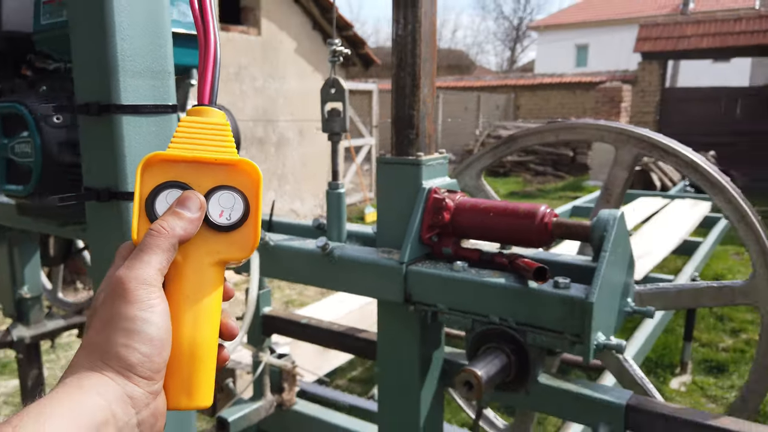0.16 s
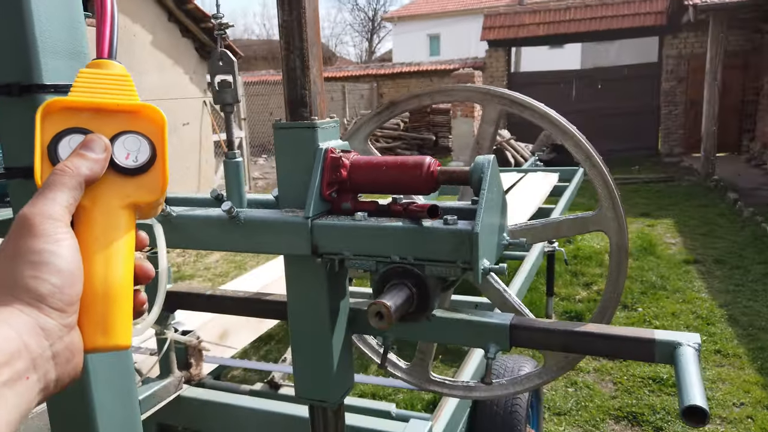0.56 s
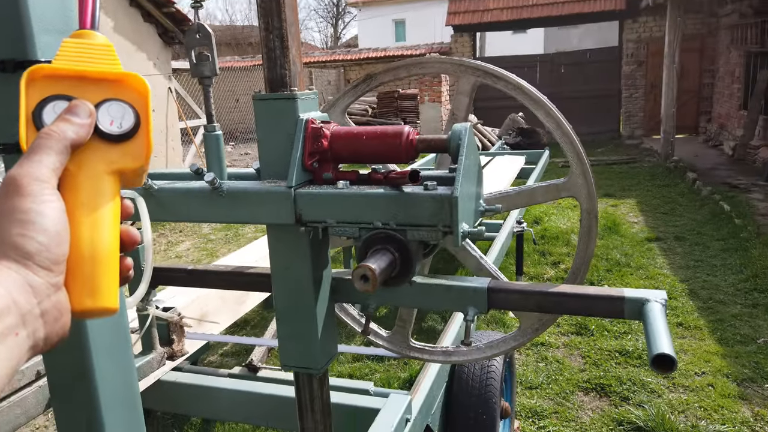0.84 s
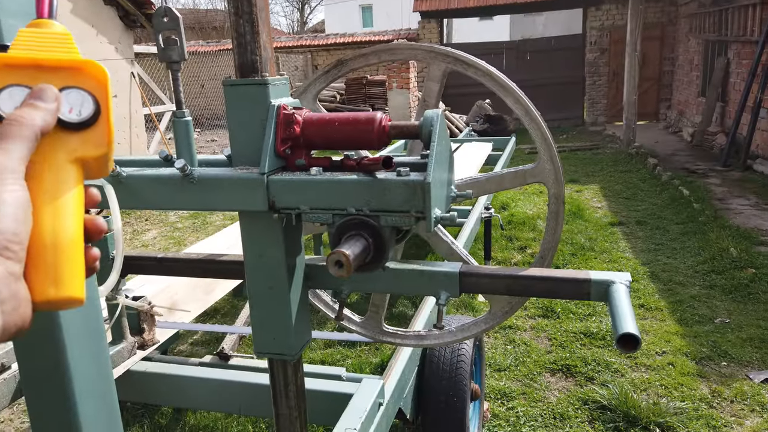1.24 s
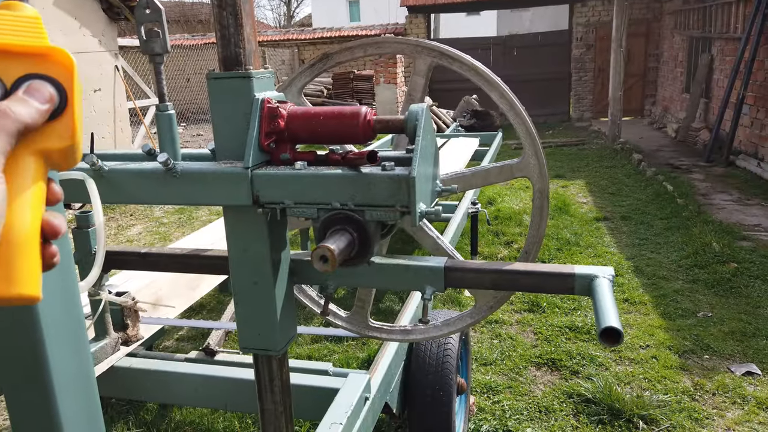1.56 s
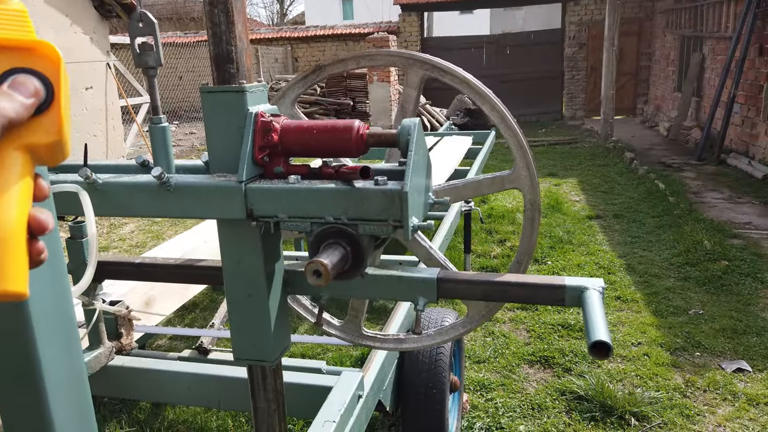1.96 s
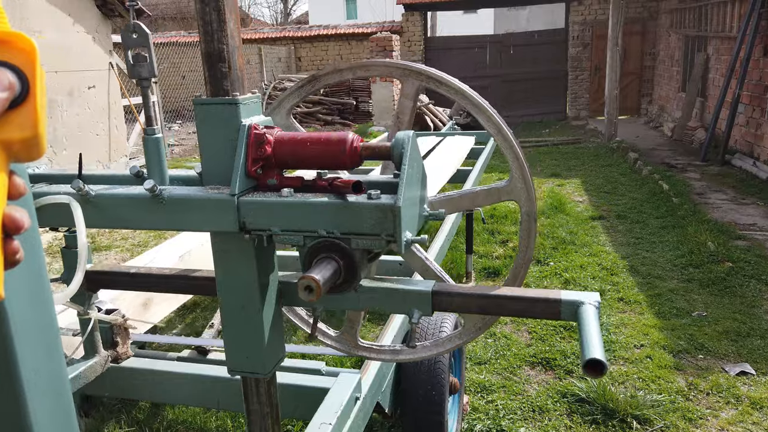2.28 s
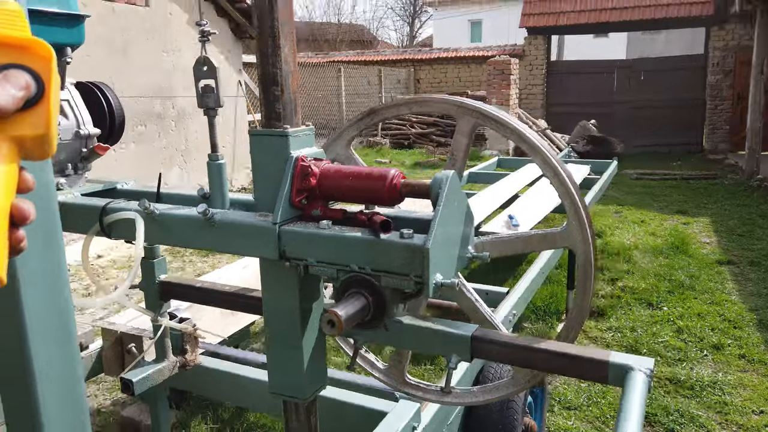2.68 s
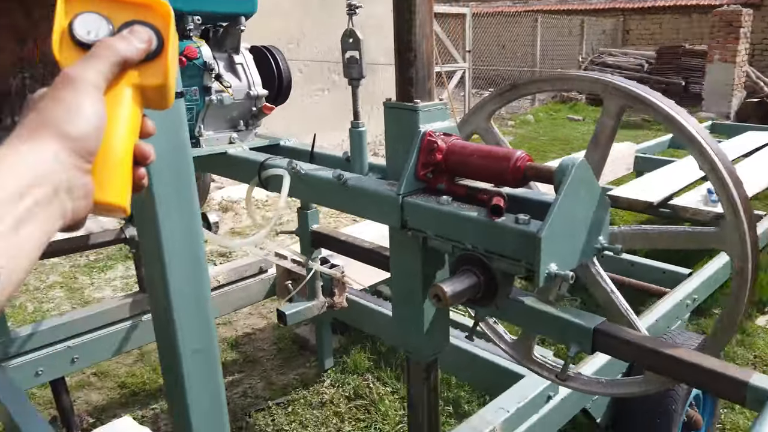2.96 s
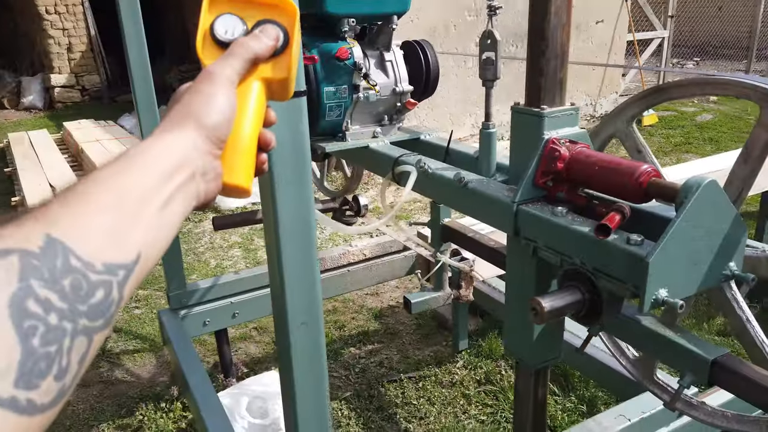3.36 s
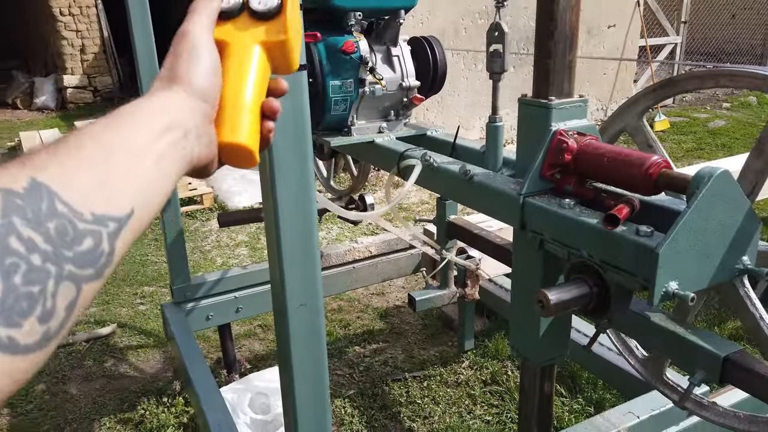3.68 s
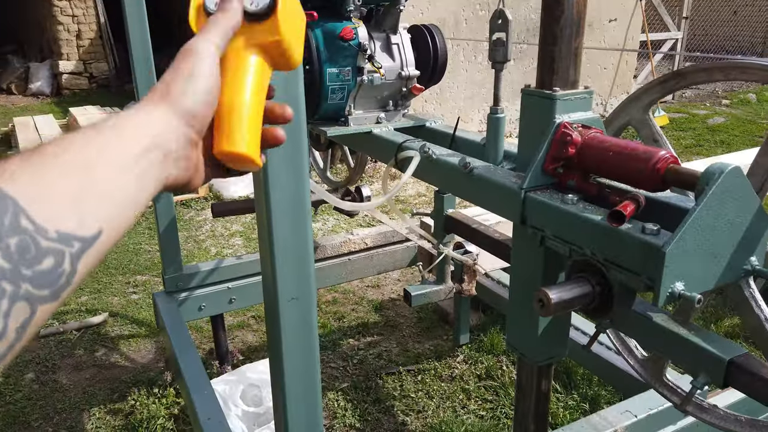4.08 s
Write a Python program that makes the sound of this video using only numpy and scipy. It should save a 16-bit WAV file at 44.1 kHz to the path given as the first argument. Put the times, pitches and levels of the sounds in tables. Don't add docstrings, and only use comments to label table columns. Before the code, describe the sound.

Close by in an open yard, a small electric hoist is already running with a gritty gear whine. It brakes at about one second, leaving a faint metal ring. Cable ticks and a thumb click fill the pause, then the motor lowers in two louder, slightly higher runs, slowing between them and coasting down at the end.

```python
import sys
import numpy as np
from scipy import signal
from scipy.fft import rfft, irfft, next_fast_len
from scipy.io import wavfile
from scipy.ndimage import uniform_filter1d

SR = 44100
rng = np.random.default_rng(int(sys.argv[2]) if len(sys.argv) > 2 else 0)


def ratio_of_db(decibels):
    return 10 ** (np.asarray(decibels, float) / 20)


def inscribe(sig):
    pcm = np.round(np.clip(np.atleast_2d(sig).T, -1, 1) * 32767)
    wavfile.write(sys.argv[1], SR, pcm.astype(np.int16))


N = 186498

# frequency in Hz, density in dB per Hz.
HUM_SPECTRUM = [(20, -19.5), (66, -24), (130, -27), (250, -36), (480, -38), (900, -44), (1900, -42),
                (2700, -43), (5000, -51), (8000, -63.5), (15000, -79)]
# on in s, off in s, first mesh in Hz, last mesh in Hz, friction in Hz per s.
HOIST_RUNS = [
    (-.5, 0.94, 257, 282, 370),
]
# on in s, off in s, first mesh in Hz, last mesh in Hz, friction in Hz per s.
LOWER_RUNS = [
    (1.655, 2.375, 346, 336, 305),
    (2.752, 3.437, 333, 339, 222),
]
# multiple of the mesh, level in dB.
HOIST_HARMONICS = [(2, -13.5), (3, -4.5), (4, -8), (5, -2), (6, -5), (7, -6), (8, -1.5), (9, -17),
                   (10, -12), (11, 1), (12, -7), (13, -7.5), (14, -15), (15, -11)]
# multiple of the mesh, level in dB.
LOWER_HARMONICS = [(2, -5.5), (3, -1), (4, 0), (5, 3), (6, 4.5), (7, 1.5), (8, -1), (9, 0), (10, -4),
                   (11, -15), (12, -4), (13, -8), (14, -10.5)]
# frequency in Hz, density in dB per Hz.
HOIST_RATTLE_SPECTRUM = [(150, -33.5), (260, -13), (700, -16.5), (1400, -9.5), (2200, -2), (3100, 0),
                         (3900, -11), (5500, -19.5), (8000, -28.5), (11500, -32.5), (15500, -47)]
# frequency in Hz, density in dB per Hz.
LOWER_RATTLE_SPECTRUM = [(150, -54), (300, -13.5), (700, -17.5), (1300, -10.5), (2200, -2.5), (3400, -9),
                         (4300, -13.5), (5500, -14.5), (8000, -23), (11500, -25.5), (15500, -36.5)]
# frequency in Hz, width in Hz, gain in dB.
CASING_MODES = [(459.6, 2.4, 17), (600, 5.2, 4.5), (833.7, 12, 14), (1290, 60, 0), (1572, 42, -3),
                (2070, 42, -5.5), (2430, 38, -9), (3214, 130, 0), (3512, 290, -4), (3985, 270, -4.5),
                (5470, 97, -3), (6550, 190, -5), (8000, 240, -1)]
# frequency in Hz, density in dB per Hz.
SHUDDER_SPECTRUM = [(60, -28.5), (100, -8.5), (150, -3.5), (210, -5), (300, -13), (410, -0.5), (700, -12.5),
                    (1200, -46)]
# start in s, level in dB.
BRAKE_JOLTS = [
    (0.96, -0.5),
]
# frequency in Hz, level in dB, t60 in s.
FRAME_MODES = [(436, -46, 0.58), (465, -78, .9), (745, -68.5, 0.64), (900, -65, 1.15), (1109, -63, 0.66),
               (1420, -59, 0.38), (1390, -57, 0.47), (1630, -62, 0.89), (1900, -50.5, 1.03),
               (2320, -73, 1.8), (2510, -68, 0.59), (2918, -69, 1.1), (5900, -63, 0.39)]
# start in s, peak in dB, pitch factor, low knock in dB.
CABLE_TICKS = [
    (1.0844, -48, 1.15, -11),
    (1.2003, -63, .99, -6),
    (1.2486, -56, .995, -22),
    (1.3668, -52, 1.04, -16.5),
    (1.5744, -62, .98, -16),
    (1.6244, -62, 1.02, -4),
]
CABLE_RINGS_HZ = (1900, 1990, 2500)
# start in s, peak in dB, pitch factor, low knock in dB.
SWITCH_CLICKS = [
    (1.4795, -41, 1.0, -32),
    (1.5843, -54, 1.02, -16),
    (1.6062, -56, 1.0, -10),
]
SWITCH_RINGS_HZ = (1490, 2235, 3600)
# time in s, side from +1 nearer the right port to -1 nearer the left.
WINCH_BEARING = [
    (0, 1),
    (2.7, 0.21),
    (3.1, -1.3),
    (4.23, -0.044),
]
# frequency in Hz, share 0 to 1.
PORT_SHARE = [(100, .7), (800, 0.83), (1400, .6), (3000, 0.4), (6000, .4), (15000, .3)]
# frequency in Hz, side minus mid in dB.
SIDE_WIDTH = [(60, -14), (110, -30.5), (200, -30), (380, -18), (700, -4.5), (1290, -5.5), (2380, -3),
              (4400, -2), (8120, 2), (15000, -0.5)]

TEETH = 16
SPIN_UP_S = 0.047
HOIST_DRAG_S, LOWER_DRAG_S = 0.1, 1.2
LOAD_DB_PER_DECADE, BRIGHT_DB_PER_DECADE, TONE_DB_PER_DECADE = 14, 18.5, 56.5
STALL_DB = 35
TORQUE_DB, TORQUE_BRIGHT_DB = -9.5, 9
TURN_DB, TURN_BRIGHT_DB = -2, -3
COAST_WHINE_DB, COAST_BRIGHT_DB = -2, -1
SHAKE_DB, SHAKE_PEAK_DB, SHAKE_HZ, SHAKE_OCTAVES, SHAKE_T60_S = -52.5, 6.5, 165, 0.37, 0.23


def evened(x):
    return x / np.sqrt(np.mean(x ** 2) + 1e-20)


def read(points, hz):
    f, value = np.transpose(points)
    return np.interp(np.log(hz + 1), np.log(f + 1), value)


def colour(x, points):
    n = x.shape[-1]
    size = next_fast_len(n)
    gain = ratio_of_db(read(points, np.fft.rfftfreq(size, 1 / SR)))
    return irfft(rfft(x, size) * gain, size)[..., :n]


def resonate(x, hz, width_hz):
    return signal.lfilter(*signal.iirpeak(hz, hz / width_hz, SR), x)


def drift(n, top_hz, count=1):
    step = 64
    noise = rng.standard_normal((count, n // step + 200))
    slow = signal.lfilter(*signal.butter(2, top_hz, fs=SR / step), noise)[:, 198:]
    return np.squeeze([np.interp(np.arange(n) / step, np.arange(len(v)), evened(v)) for v in slow])


def yard():
    hum = evened(colour(rng.standard_normal(N), HUM_SPECTRUM))
    wind = evened(resonate(resonate(rng.standard_normal(N), 42, 33), 42, 33))
    return hum * ratio_of_db(-73.5 + 2.7 * drift(N, 2.8)) + wind * ratio_of_db(-73 + drift(N, 3.9))


def motor(runs, drag_s):
    t = np.arange(N) / SR
    hz, torque, coast, left_hz = np.zeros(N), np.zeros(N), np.ones(N), 0
    next_on_s = [run[0] for run in runs[1:]] + [N / SR]
    for (on, off, first_hz, last_hz, friction), after in zip(runs, next_on_s):
        aim_hz = first_hz + (last_hz - first_hz) * np.clip((t - on) / (off - on), 0, 1)
        lag = (1 - left_hz / first_hz) * np.exp(-np.maximum(t - on, 0) / SPIN_UP_S)
        fall_hz = last_hz + friction * drag_s
        slowing_hz = fall_hz * (np.exp(-np.maximum(t - off, 0) / drag_s) - 1)
        hz = np.where(t >= on, np.maximum(aim_hz * (1 - lag) + slowing_hz, 0), hz)
        torque = np.where(t >= on, lag * (t < off), torque)
        coast = np.where(t >= on, t >= off, coast)
        left_hz = max(last_hz + fall_hz * (np.exp(-max(after - off, 0) / drag_s) - 1), 0)
    return hz, uniform_filter1d(torque, size=200), uniform_filter1d(coast, size=900)


def levels(runs, drag_s, load_db, tone_db, strain_db_per_s):
    t = np.arange(round(max(runs[0][0], 0) * SR), N) / SR
    hz, torque, coast = (c[-len(t):] for c in motor(runs, drag_s))
    decades = np.log10(hz / hz.max() + .01)
    away = (1 - np.interp(t, *np.transpose(WINCH_BEARING))) / 2
    strain_db = strain_db_per_s * t
    fall_db = (LOAD_DB_PER_DECADE * decades - STALL_DB * decades ** 2) * (coast + 0.21 * (1 - coast))
    load_db = load_db + fall_db + TORQUE_DB * torque + TURN_DB * away
    bright_db = BRIGHT_DB_PER_DECADE * np.maximum(decades, -.7) + TORQUE_BRIGHT_DB * torque
    bright_db = bright_db + COAST_BRIGHT_DB * coast + TURN_BRIGHT_DB * away + .55 * strain_db
    tone_db = tone_db + TONE_DB_PER_DECADE * decades + strain_db + 2.0 * drift(len(t), 13)
    return t, hz + 1, load_db, bright_db, tone_db, torque, coast


def panels(x, modes_db, patchy_db):
    z = signal.stft(x, nperseg=512)[2]
    modes = evened(rng.standard_normal((len(z[0]), 1)))
    patches = uniform_filter1d(rng.standard_normal(z.shape), 5, 1)
    patches = evened(uniform_filter1d(patches, 5, 2))
    thin = np.clip(np.linspace(-.1, 3.0, len(z[0])), .2, 1)[:, None]
    z = z * ratio_of_db(modes_db * modes + patchy_db * thin * patches)
    return signal.istft(z, nperseg=512)[1][:, :x.shape[1]]


def mesh_whine(mesh, hz, runout, orders, rattle_points, wobble, uneven):
    n = len(mesh)
    whine = np.zeros((2, n))
    for k, db in orders:
        waver = 1 + uneven * np.sqrt(k) * (drift(n, 24, count=2) + 1j * drift(n, 22, count=2))
        waver = waver / np.sqrt(1 + 2 * k * uneven ** 2)
        phase = k * mesh + 2 * np.pi * rng.random((2, 1))
        radiated_db = read(rattle_points, k * hz) - read(rattle_points, k * hz.max())
        whine += ratio_of_db(db + np.minimum(0, radiated_db)) * ((waver + wobble * runout) * np.exp(1j * phase)).real
    return evened(whine)


def backlash_rattle(mesh, hz, torque, bright_db, slap, points):
    n = len(mesh)
    puffs = 3.1 + 0.16 * np.cos(mesh) * np.abs(1 + 0.061 * drift(n, 120))
    rattle = panels(rng.standard_normal((2, n)) * puffs, modes_db=2.5, patchy_db=3.06)
    rattle = evened(colour(rattle, points))
    treble = colour(rattle, [(2500, -30), (5600, 0)])
    top = colour(rattle, [(6500, -60), (8000, 0)])
    bright = ratio_of_db(bright_db) / slap ** 0.035
    pace = np.minimum(1, torque + hz / (0.52 * hz.max())) ** 3.7
    return slap * (rattle + (bright - 1) * treble + bright * (pace - 1) * top)


def gearbox(controls, orders, rattle_points, whine_db, rattle_db, wobble, uneven, slap_teeth, slap_db, casing_db):
    t, hz, load_db, bright_db, tone_db, torque, coast = controls
    n = len(t)
    mesh = 2 * np.pi * np.cumsum(hz * (1 + 0.0025 * drift(n, 25))) / SR
    shaft = mesh / TEETH
    runout = np.exp(1j * shaft) + .5 * np.exp(2j * shaft) + 0.77 * np.exp(3j * shaft) + 0.067 * np.exp(-1j * shaft)
    first = (1 + 0.34 * runout + 0.27 * drift(n, 34)) * np.exp(1j * mesh)
    tone = np.sqrt(2) * ratio_of_db(tone_db) * first.real
    slap = ratio_of_db(slap_db * np.cos(mesh / slap_teeth) + 2.0 * drift(n, 24.4))
    whine = mesh_whine(mesh, hz, runout, orders, rattle_points, wobble, uneven) * np.sqrt(slap)
    rattle = backlash_rattle(mesh, hz, torque, bright_db, slap, rattle_points)
    drive = ratio_of_db(load_db) * (ratio_of_db(whine_db + COAST_WHINE_DB * coast) * whine + ratio_of_db(rattle_db) * rattle)
    drive = drive + ratio_of_db(4) * np.abs(torque) ** .3 * resonate(drive, 3450, 300)
    casing = sum(ratio_of_db(db) * resonate(drive, f, width_hz) for f, width_hz, db in CASING_MODES)
    at = N - n
    fade_in = np.minimum(1, (t - t[0]) / 0.0074 + (at == 0))
    out = np.zeros((2, N))
    out[:, at:] = (drive + ratio_of_db(casing_db) * casing + tone) * fade_in
    return out


def winch():
    hoist = levels(HOIST_RUNS, HOIST_DRAG_S, load_db=-25, tone_db=-51, strain_db_per_s=8)
    lower = levels(LOWER_RUNS, LOWER_DRAG_S, load_db=-22, tone_db=-37.5, strain_db_per_s=-0.23)
    up = gearbox(hoist, HOIST_HARMONICS, HOIST_RATTLE_SPECTRUM, whine_db=-9, rattle_db=-3.5,
                 wobble=0.13, uneven=0.43, slap_teeth=8.7, slap_db=-1, casing_db=-9)
    down = gearbox(lower, LOWER_HARMONICS, LOWER_RATTLE_SPECTRUM, whine_db=-5.5, rattle_db=-5.5,
                   wobble=0.26, uneven=0.69, slap_teeth=32, slap_db=0, casing_db=-1)
    return up + down


def shudder():
    hz = motor(HOIST_RUNS, HOIST_DRAG_S)[0] + motor(LOWER_RUNS, LOWER_DRAG_S)[0] + .01
    peak = np.exp(-(np.log2(hz / SHAKE_HZ) / SHAKE_OCTAVES) ** 2)
    level_db = SHAKE_DB + 12 * np.log10(np.minimum(hz / 60, 1)) + SHAKE_PEAK_DB * peak
    decay_db = 60 * np.arange(N) / SR / SHAKE_T60_S
    level_db = np.maximum.accumulate(level_db + decay_db) - decay_db
    body = evened(colour(rng.standard_normal((2, N)), SHUDDER_SPECTRUM))
    return ratio_of_db(level_db + 1.4 * drift(N, 3)) * body


def scatter(x, t60_s):
    at = np.arange(0, round(.3 * SR), 22)
    taps = np.zeros(at[-1] + 22)
    signs = rng.choice([-1., 1.], len(at))
    taps[at + rng.integers(0, 22, len(at))] = signs * ratio_of_db(-60 * at / SR / t60_s)
    taps = signal.lfilter(*signal.butter(2, 600, "high", fs=SR), taps)
    return signal.oaconvolve(x, taps / np.linalg.norm(taps))[:N]


def frame():
    out, t = np.zeros((2, N)), np.arange(SR) / SR
    for s, jolt_db in BRAKE_JOLTS:
        at = round(s * SR)
        for f, db, t60_s in FRAME_MODES:
            level = ratio_of_db(jolt_db + db - 60 * t / t60_s + 1.3 * drift(SR, 10))
            ring = level * np.sin(2 * np.pi * (f * t + rng.random((2, 1))))
            out[:, at:at + SR] += (ring * np.minimum(1, t / .03))[:, :N - at]
    return out


def ticks():
    out, t = np.zeros(N), np.arange(1500) / SR
    for rows, rings_hz in ((CABLE_TICKS, CABLE_RINGS_HZ), (SWITCH_CLICKS, SWITCH_RINGS_HZ)):
        for s, db, pitch, knock_db in rows:
            rings = sum(share * np.sin(2 * np.pi * f * pitch * t) for f, share in zip(rings_hz, (.7, .85, .9)))
            crack = resonate(resonate(rng.standard_normal(len(t)), 2600, 3000), 2600, 3000)
            crack = 1.3 * crack * ratio_of_db(-60 * t / .03)
            knock = ratio_of_db(knock_db - 5) * np.sin(2 * np.pi * 380 * t)
            envelope = ratio_of_db(db - 5 - 60 * t / 0.019) * np.minimum(1, t / 0.0013)
            at = round(s * SR)
            out[at:at + len(t)] += envelope * (rings + crack + knock)
    return signal.sosfilt(signal.butter(6, 4900, fs=SR, output="sos"), out)


def stereo(mid, other):
    share = np.clip(read(PORT_SHARE, np.fft.rfftfreq(N, 1 / SR)), 0, 1)
    bearing = np.interp(np.arange(N) / SR, *np.transpose(WINCH_BEARING))
    delayed = bearing * irfft(-1j * share * rfft(mid), N)
    spread = irfft(np.sqrt(1 - share ** 2) * rfft(other), N)
    side = colour(delayed + spread, SIDE_WIDTH)
    return np.array([mid + side, mid - side])


def scene():
    faces = winch() + shudder() + frame()
    clicks = ticks()
    heard = []
    for face in faces:
        echoes = ratio_of_db(-11) * scatter(face, t60_s=.21) + ratio_of_db(-1.5) * scatter(clicks, t60_s=0.017)
        heard.append(yard() + face + clicks + echoes)
    return stereo(*heard)


def band_limit(x):
    return signal.sosfilt(signal.butter(12, 15670, fs=SR, output="sos"), x)


def record(dry):
    return band_limit(dry)


dry = scene()
out = record(dry)
inscribe(out)
```